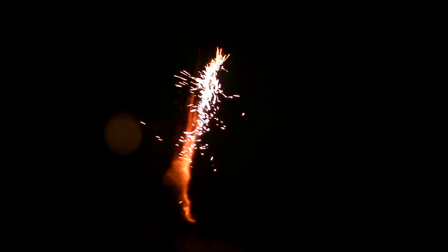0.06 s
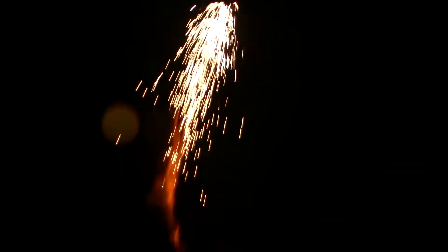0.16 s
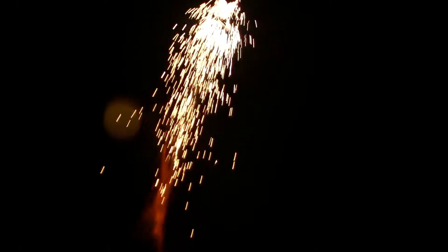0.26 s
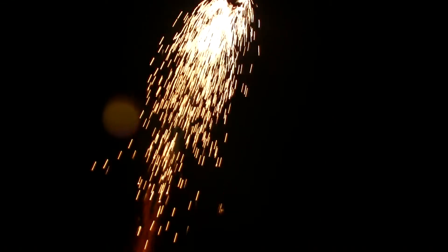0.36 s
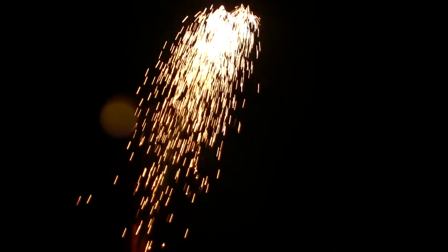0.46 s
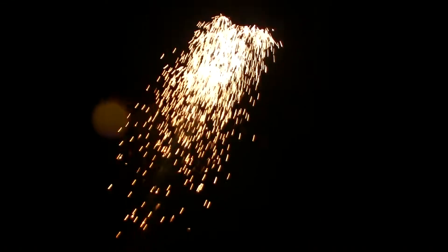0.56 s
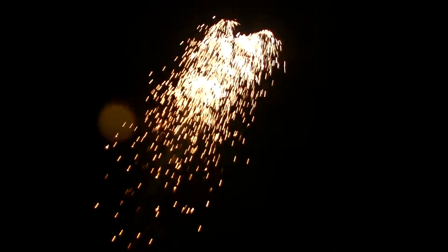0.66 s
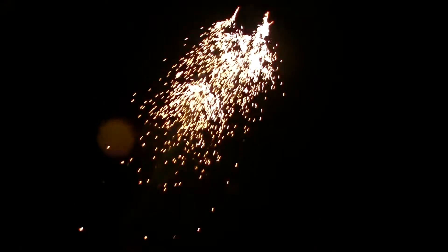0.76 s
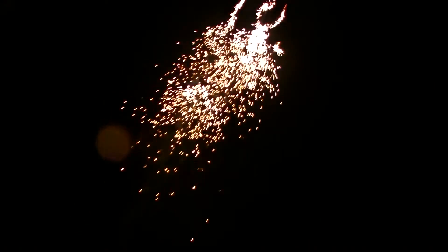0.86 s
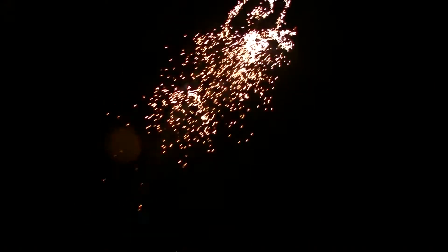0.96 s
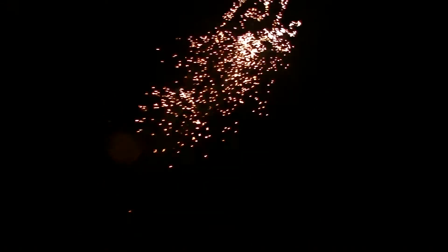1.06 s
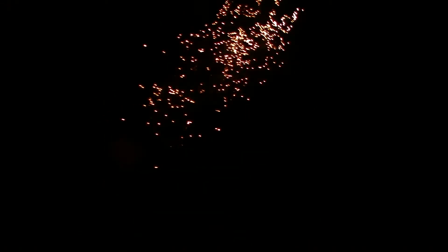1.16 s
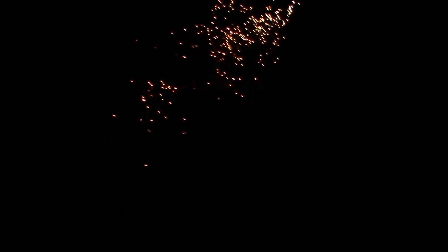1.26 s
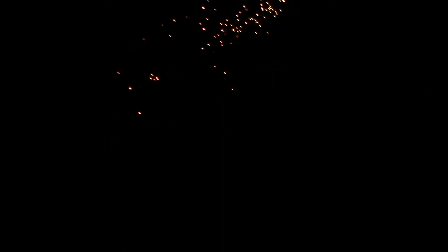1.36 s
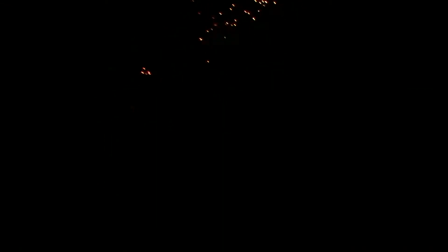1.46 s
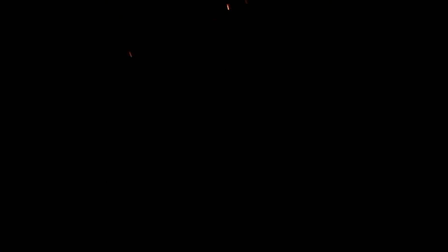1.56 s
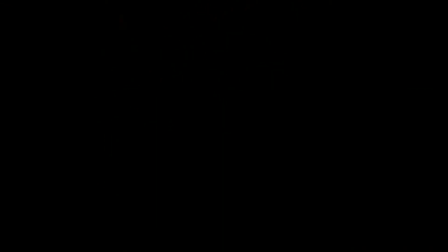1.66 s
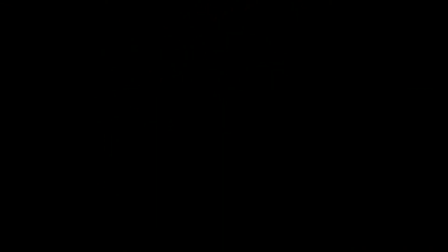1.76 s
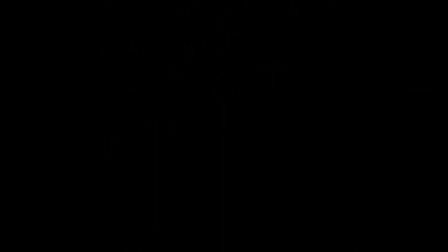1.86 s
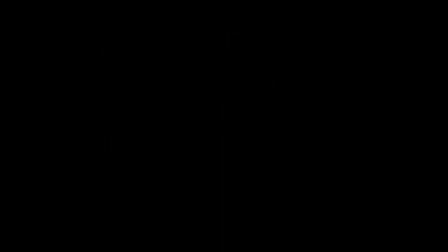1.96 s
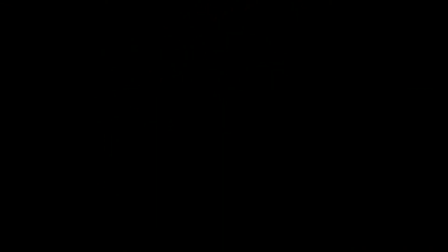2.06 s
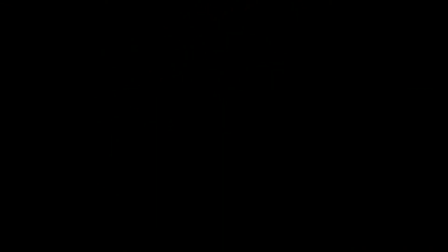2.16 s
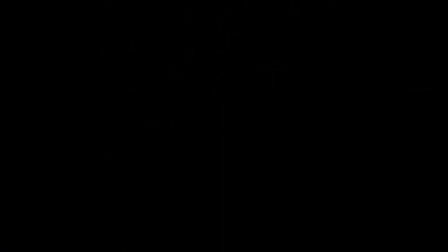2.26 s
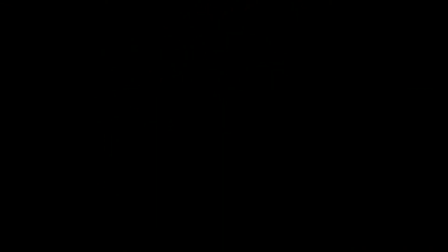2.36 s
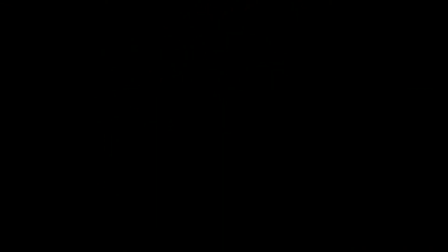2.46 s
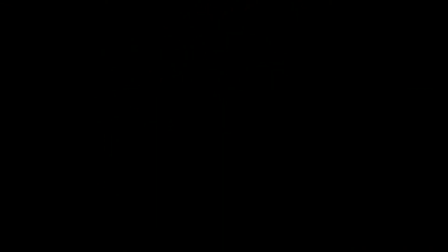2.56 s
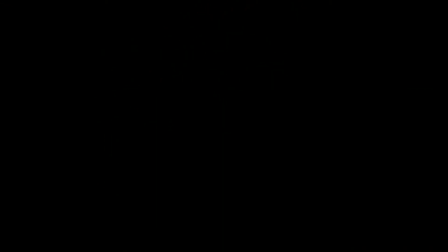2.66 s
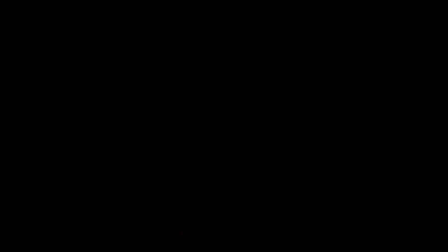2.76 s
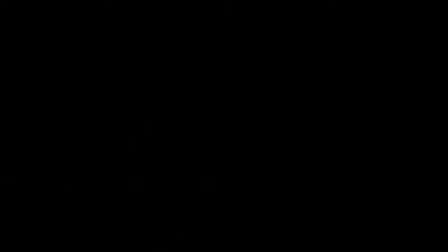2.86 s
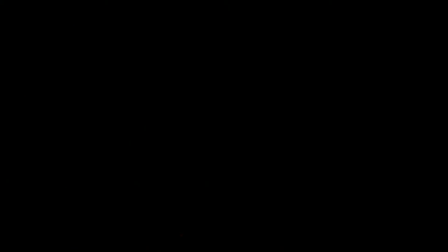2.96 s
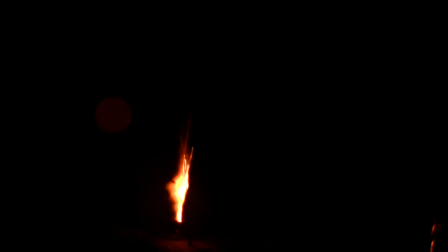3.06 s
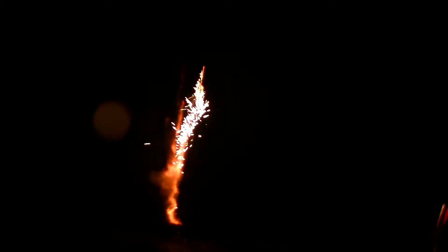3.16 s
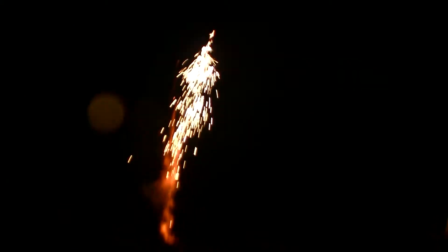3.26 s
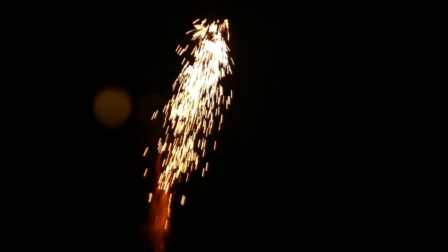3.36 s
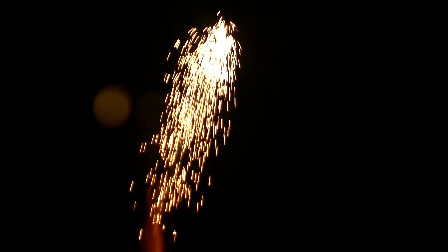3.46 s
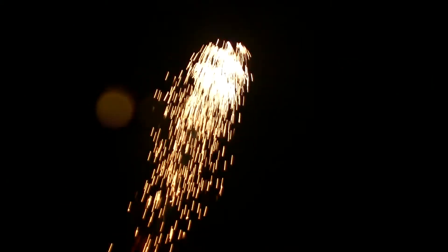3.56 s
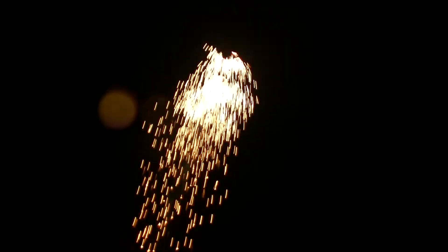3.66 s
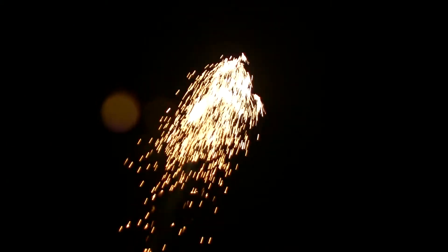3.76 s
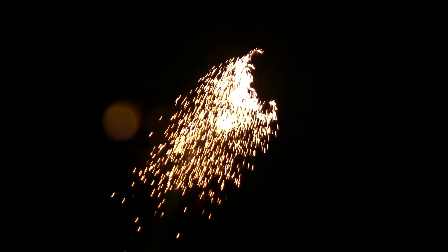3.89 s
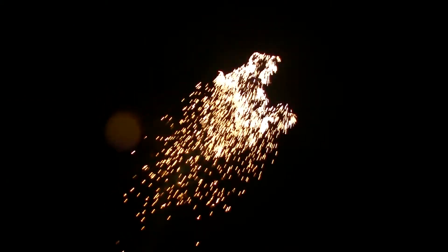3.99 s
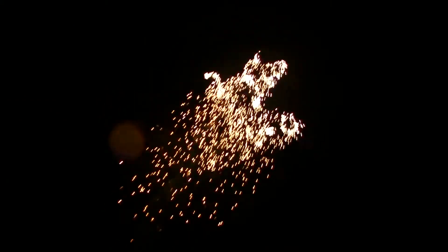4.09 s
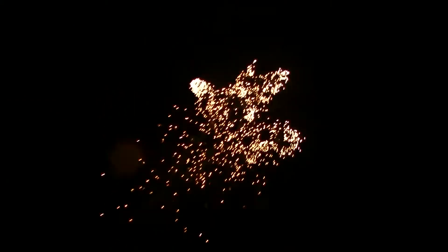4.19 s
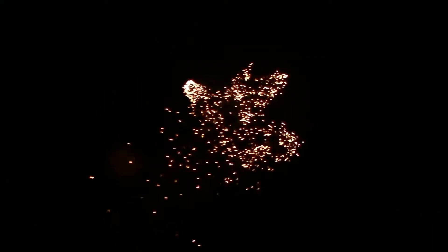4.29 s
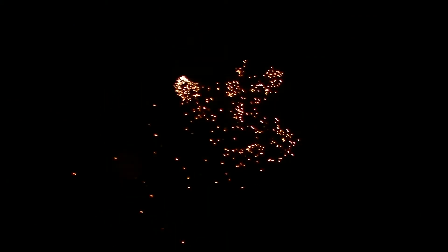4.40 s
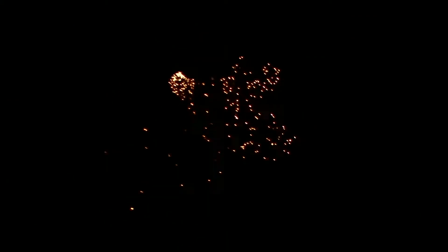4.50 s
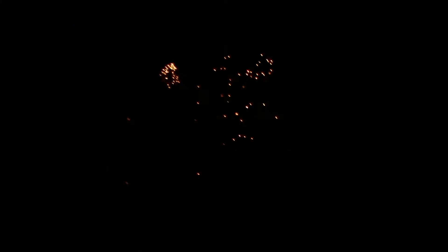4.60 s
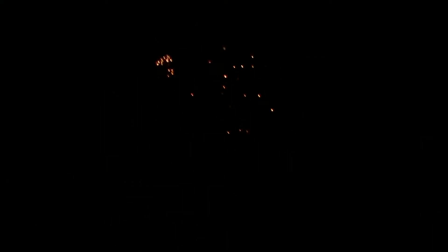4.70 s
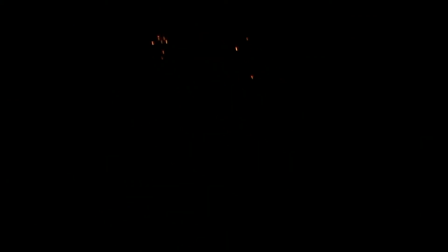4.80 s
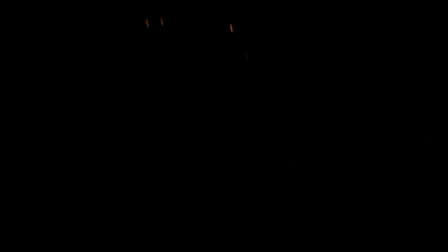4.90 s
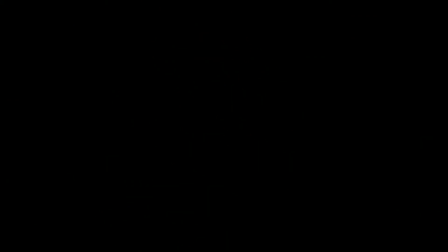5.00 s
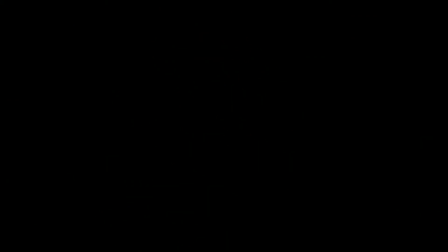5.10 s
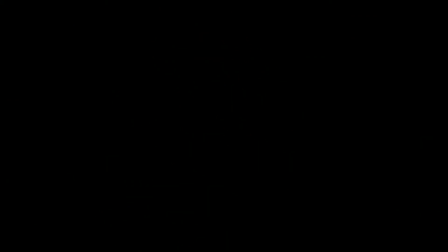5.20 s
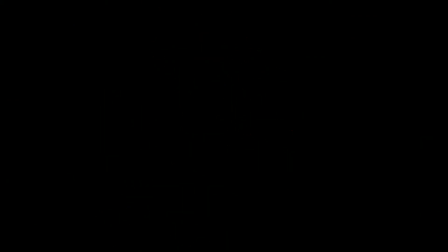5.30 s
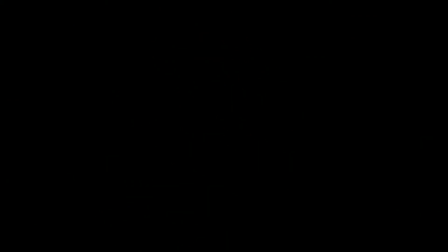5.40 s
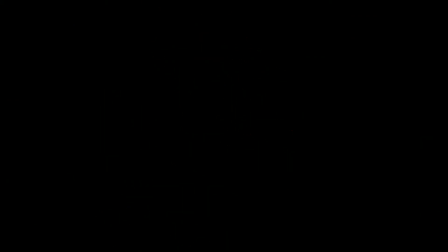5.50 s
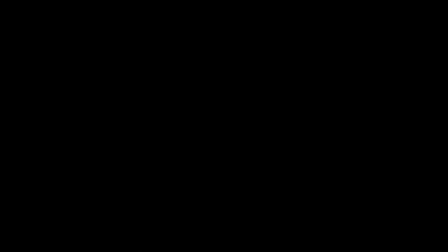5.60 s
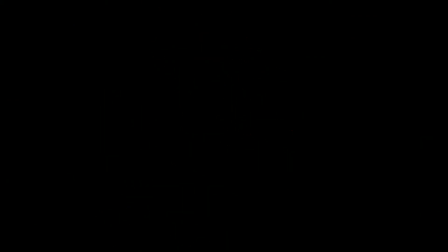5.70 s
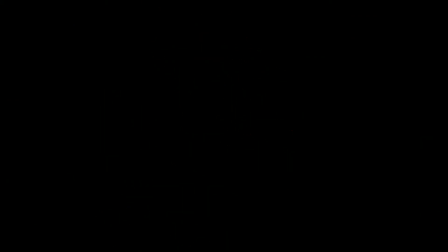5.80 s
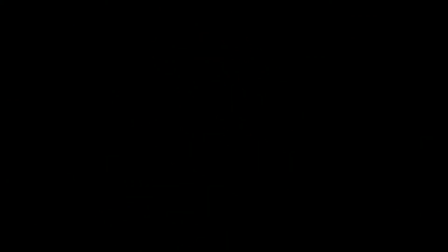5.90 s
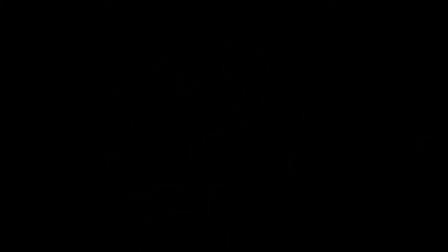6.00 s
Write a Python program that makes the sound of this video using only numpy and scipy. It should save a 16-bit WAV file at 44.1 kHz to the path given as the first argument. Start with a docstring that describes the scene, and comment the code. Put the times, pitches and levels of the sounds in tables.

```python
"""Outdoors at night, a firework tube fires twice: each lift charge pops and throws up a pair of whistlers.
Burning pipes make the whistles, which fall in pitch, rasp, then clear and bend upward as they burn out.
Random puffs of gas make the rough sputter; short noise bursts make the ticking sparks.
The surroundings echo, the first pop leaves a low tail, and light wind touches the microphone.
A gain control ducks at loud sound and slowly brings the night air back."""
import sys
import numpy as np
from scipy import signal
from scipy.fft import rfft, irfft, next_fast_len
from scipy.io import wavfile
from scipy.ndimage import uniform_filter1d, map_coordinates

SR = 44100
rng = np.random.default_rng(int(sys.argv[2]) if len(sys.argv) > 2 else 0)


def inscribe(sig):
    """Save sig as 16-bit PCM at rate SR to the path in sys.argv[1].

    A 1-D sig is mono; a 2-D sig holds one channel per row.
    Samples are clipped to [-1, 1] before scaling.
    """
    pcm = np.round(np.clip(np.atleast_2d(sig).T, -1, 1) * 32767)
    wavfile.write(sys.argv[1], SR, pcm.astype(np.int16))


N = 266540
TIME = np.arange(N) / SR  # seconds

# When the tube fires. Each entry: launch time in seconds (the first is just before the sound begins).
LAUNCHES = [-0.032, 3.1099]


def amp(db):
    """Turn decibels into a gain."""
    return 10 ** (np.asarray(db) / 20)


def unit(x):
    """Scale a sound to rms 1."""
    return x / np.sqrt(np.mean(x ** 2) + 1e-20)


def along(points, hz):
    """Read a curve of (Hz, value) points on a log frequency axis."""
    f, v = np.transpose(points)
    return np.interp(np.log(hz + 1), np.log(f), v)


def wobble(rate):
    """A smooth random curve through this many random points a second."""
    knots = rng.standard_normal(int(N * rate / SR) + 4)
    fine = np.arange(0, len(knots) - 1, 1 / 8)
    return np.interp(TIME * rate, fine, map_coordinates(knots, [fine]))


def filtered(x, gain):
    """Filter x to this gain over frequency, with a response that never starts early (minimum phase)."""
    size = 2 * next_fast_len(N // 2 + SR // 4)
    cepstrum = irfft(np.log(np.maximum(gain(np.fft.rfftfreq(size, 1 / SR)), 1e-6)))
    fold = np.r_[1, np.full(size // 2 - 1, 2), 1, np.zeros(size // 2 - 1)]
    response = np.exp(rfft(cepstrum * fold))
    return irfft(rfft(x, size) * response)[:N]


def coloured(x, spectrum):
    """Shape x by (Hz, dB) points and scale it to rms 1."""
    return unit(filtered(x, lambda hz: amp(along(spectrum, hz))))


def noise(spectrum):
    """Coloured noise of rms 1."""
    return coloured(rng.standard_normal(N), spectrum)


def fading(start, t60):
    """An envelope that jumps to 1 at start and falls 60 dB every t60 seconds."""
    return (TIME >= start) * amp(-60 * np.maximum(TIME - start, 0) / t60)


def fading_after(end, t60):
    """An envelope that stays at 1 until end, then falls 60 dB every t60 seconds."""
    return amp(-60 * np.maximum(TIME - end, 0) / t60)


def bump(centre, spread):
    """A smooth swell of height 1, down to about a third at spread seconds either side."""
    return np.exp(-((TIME - centre) / spread) ** 2)


def progress(start, end):
    """Runs from 0 at start to 1 at end."""
    return np.clip((TIME - start) / (end - start), 0, 1)


def night():
    """Soft noise for outdoor air, and low noise for the first pop's tail and for wind on the microphone."""
    # Sound of the open air. Each row: frequency in Hz, relative level in dB per Hz.
    air_colour = [(25, -11), (120, -2.5), (300, -4), (700, -10), (1500, -18.5), (3000, -22), (5000, -26.5),
                  (9000, -28.5), (15000, -38)]
    # Low rumble of the pop's tail and of the wind. Each row: frequency in Hz, relative level in dB per Hz.
    rumble_colour = [(12, -45.5), (20, -13), (103, -3), (225, -8.5), (282, -14.5), (458, -26), (528, -26),
                     (600, -28), (780, -59.5), (1320, -120)]
    # Swells of the rumble: the first row is the low tail of the first pop, still dying away as the sound
    # begins; the rest are gusts. Each row: middle in seconds, spread in seconds, level in dB before flutter.
    swells = [(0, 0.068, -40), (1.62, 0.018, -45), (1.79, 0.048, -38), (1.9, 0.1, -40), (2.189, 0.027, -44),
              (2.48, 0.18, -54), (2.81, 0.056, -47.5), (5.17, 0.079, -56), (5.58, 0.092, -59)]
    (tail_middle, tail_spread, tail_db), gusts = swells[0], swells[1:]
    pop_tail = amp(tail_db) * bump(tail_middle, tail_spread)
    wind = amp(-63)  # the breeze between gusts
    for middle, spread, db in gusts:
        wind = wind + amp(db) * bump(middle, spread)
    air = amp(-57.0) * noise(air_colour)
    flutter = amp(0.84 * wobble(25))
    return air + (pop_tail + wind) * flutter * noise(rumble_colour)


def echo(x):
    """The far surroundings answer for seconds, as a noise tail that dies at its own speed in each band."""
    # How long the echo rings. Each row: frequency in Hz, time to fall 60 dB in seconds.
    ring_times = [(200, 1.8), (750, 3.26), (1130, 6), (1600, 4.67), (2000, 3.53), (2380, 4.08), (2900, 3.1),
                  (4000, 2.25), (6000, 2), (12000, 1)]
    # Tone of the echo. Each row: frequency in Hz, relative starting level in dB.
    echo_tone = [(100, -11.5), (600, 1.5), (1150, -2.5), (1600, -2), (2050, 1.5), (2300, 4.5), (2520, 1.5),
                 (3000, 2.5), (4200, 6.5), (6000, -1), (9000, 5), (15000, -15)]
    hz, t, z = signal.stft(rng.standard_normal(3 * SR), SR, nperseg=256)
    start_db = along(echo_tone, hz)[:, None]
    shape = amp(start_db - 60 * t / along(ring_times, hz)[:, None])
    tail = signal.istft(z * shape, SR, nperseg=256)[1] / np.sqrt(SR)
    return signal.fftconvolve(x, tail)[:N]


def sparks(rate=1500, scatter_db=4):
    """Dying sparks snap as brief noise bursts, among a faint random crackle; rate is ticks a second."""
    # Tone of a tick. Each row: frequency in Hz, relative level in dB per Hz.
    tick_colour = [(1000, -21.5), (4000, -2.5), (7000, -9), (12000, -25), (16000, -24)]
    # Single snaps. Each row: start in seconds, starting level in dB.
    snap_list = [(1.2984, -52), (1.5556, -43), (1.5678, -50), (1.606, -50), (1.649, -43), (1.717, -50),
                 (1.768, -44.5), (1.8525, -47.5), (2.0307, -50), (4.79, -52), (4.8353, -51.5), (5.011, -55),
                 (5.1128, -50.5)]
    # Clouds of dying sparks. Each row: middle in seconds, spread in seconds, level in dB before filtering.
    clouds = [(1.3, 0.27, -29), (4.55, 0.39, -40.5)]
    snap_envelope = sum(amp(db) * fading(start, t60=0.0073) for start, db in snap_list)
    snaps = noise(tick_colour) * snap_envelope
    density = 0
    for middle, spread, db in clouds:
        density = density + amp(db) * np.exp(-((TIME - middle) / spread) ** 2 / 2)
    sizes = amp(scatter_db * np.clip(rng.standard_normal(N), -2, 2))
    ticks = (rng.random(N) < rate / SR) * density * sizes
    return snaps + filtered(ticks, lambda hz: amp(along(tick_colour, hz)))


def pop(start, lead=0.0045, swing=0.002, cut_hz=90):
    """Gas jets past the shell for lead seconds, then the lift charge bursts out and the tube booms."""
    # Ringing of the tube. Each row: frequency in Hz, level in dB, time to fall 60 dB in seconds.
    tube_modes = [(99, -13, 0.084), (206, -10, .05), (263, 0, 0.035), (426, -5.5, 0.053),
                  (517, -18, 0.0073)]
    # Noise of the burst. Each row: frequency in Hz, relative level in dB per Hz.
    blast_colour = [(60, -4.5), (300, -5), (1200, -3.5), (4000, -6), (8000, -13.5), (15000, -32)]
    # Hiss of the escaping gas. Each row: frequency in Hz, relative level in dB per Hz.
    jet_colour = [(100, -17), (1500, -1), (3200, 7.5), (5000, 0.5), (8000, -11), (15000, -32)]
    age = np.maximum(TIME - start, 0)
    jet = amp(-16) * noise(jet_colour) * fading(start - lead, .08) * (TIME < start)
    boom = 0
    for hz, db, t60 in tube_modes:
        boom = boom - amp(db) * np.sin(2 * np.pi * hz * age) * fading(start, t60)
    shock = -amp(-1) * np.sin(2 * np.pi * age / swing) * (age < swing)  # one violent pressure swing
    blast_envelope = amp(-4) * fading(start, 0.052) + amp(-31.5) * fading(start, .16)
    blast = noise(blast_colour) * blast_envelope

    def bass_cut(hz):  # the deepest bass of the pop is cut away
        return 1 / np.hypot(1, (cut_hz / (hz + 1)) ** 3)
    return filtered(jet + boom + shock + blast, bass_cut)


def flight_time():
    """Seconds since the latest launch."""
    return TIME - np.where(TIME < LAUNCHES[1], *LAUNCHES)


def climb(x, bounce, soft_hz=3500, far_hz=10000, dull_after=0.67):
    """As the cluster climbs, air dulls it and the ground's dull copy comes later: a comb that sweeps down."""
    far = np.clip(flight_time() / dull_after, 0, 1) ** 3
    distant = filtered(x, lambda hz: 1 / np.hypot(1, (hz / far_hz) ** 3))
    x = (1 - far) * x + far * distant
    # seconds: lag at launch, the most the climb can add, how soon the climb slows
    first_lag_s, added_lag_s, slowing_s = 0.001075, .0072, 0.6726
    lag = first_lag_s + added_lag_s * (1 - np.exp(-flight_time() / slowing_s))
    soft = filtered(x, lambda hz: 1 / np.hypot(1, hz / soft_hz))
    return x + bounce * np.interp(TIME - lag, TIME, soft)


def surge():
    """How far the burning surges above or stalls below its usual strength, in dB."""
    # Surges and stalls. Each row: middle in seconds, change in dB.
    surges = [(.015, -9), (.037, 1), (.056, -6.5), (.1, 3), (.455, -5), (.48, 1.5), (.535, -4), (.735, 3),
              (.8, -2), (.922, -2.5), (.965, 2.5), (.998, -7), (1.028, 1), (3.173, 3.5), (3.213, -6.5),
              (3.282, 4), (3.314, 4), (3.4, -4.5), (3.435, 0.5), (3.51, -5), (3.545, -0.5), (3.58, -5.5),
              (3.62, 0.5), (4.108, 2.5), (4.136, -3), (4.21, 3.5), (4.345, -9.5), (4.37, 5), (4.437, -6.5)]
    return sum(db * bump(middle, 0.013) for middle, db in surges)


def burning(start, end, level_db, roar_fade_db, rasp_fade_db):
    """Gate, roar dB and rasp dB of one shot: the roar swells, the rasp weakens, then both are quickly gone."""
    spent = progress(start, end)
    gate = progress(start, start + 0.026) * fading_after(end, t60=0.29)
    db = level_db + surge()
    roar_db = db + 5 - 8 * (1 - spent) ** 3 - roar_fade_db * spent ** 4  # weakens late
    rasp_db = db + 6 - rasp_fade_db * spent ** 3.66
    return gate, roar_db, rasp_db


def sputter(row, rate=2300, scatter_db=1.0, split_hz=3000, surge_db=1, crack_db=-15, crack_hz=8500):
    """Unsteady burning: a hail of gas puffs makes roar and rasp; the biggest steepen into cracks."""
    # Tone of one puff of burning gas. Each row: frequency in Hz, relative level in dB per Hz.
    puff_colour = [(47, -62), (80, -28.5), (139, -24), (242, -12), (411, -9.5), (654, -5), (834, -8.5),
                   (1420, -3.5), (1810, -3.5), (2750, -1), (5840, -12.5), (8890, -29.5), (11600, -38.5),
                   (15800, -50.5)]
    gate, roar_db, rasp_db = burning(*row)
    scatter = amp(scatter_db * np.clip(rng.standard_normal(N), -2.3, 2.3))
    sizes = (rng.random(N) < rate / SR) * scatter  # rate is puffs a second
    puffs = coloured(sizes - sizes.mean(), puff_colour)

    def above(edge):
        return lambda hz: (hz / edge) ** 4 / (1 + (hz / edge) ** 4)
    roar = unit(filtered(puffs, lambda hz: 1 / np.sqrt(1 + (hz / split_hz) ** 4)))
    rasp = unit(filtered(puffs, above(split_hz)))
    # the fifth power makes the biggest puffs stand out
    cracks = unit(filtered(coloured(sizes ** 5, puff_colour), above(crack_hz)))
    bright = rasp + amp(crack_db) * cracks
    unsteady = amp(surge_db * wobble(70))
    return gate * unsteady * (amp(roar_db) * roar + amp(rasp_db) * bright)


def glide(start, bottom, turn, end, early_hz, low_hz, fall):
    """The pitch in Hz falls as fuel burns down the pipe, then rises and bends up towards burn-out."""
    # a freshly lit pipe starts higher and soon settles
    kick = 678.4 * np.exp(-np.maximum(TIME - start, 0) / .06)
    drop = (early_hz - low_hz) * (1 - progress(start, bottom)) ** fall
    rise = 1850 * (np.clip(TIME, turn, end) - turn)  # Hz per second
    last_bend = 291 * bump(end, .062)
    return low_hz + kick + drop + rise + last_bend


def life(start, end, level_db, loudest, spell, calming):
    """Gate, dB and roughness of a whistler: clear start, rough flight, loud spell and calm fading end."""
    age, left = np.maximum(TIME - start, 0), np.maximum(end - TIME, 0)
    fresh = np.exp(-(age / 0.12) ** 4)  # it starts loud and fairly clean
    gate = progress(start, start + 0.028) ** 2 * np.minimum(left / .02, 1)
    burn_out_db = -14 * np.exp(-left / 0.053)  # it fades as the fuel ends
    db = level_db + 7.5 * fresh + 8.5 * bump(loudest, spell) + burn_out_db
    roughest, calmest = .93, 0.084  # on a scale of 0 to 1
    rough = calmest + (roughest - calmest) * (1 - .42 * fresh) * (1 - bump(end, calming))
    return gate, db, np.clip(rough, 0, 1)


def whistler(row, jitter=.068, wander=0.01313, flutter_db=4, shimmer_db=5, air_hz=11000, short_hz=3100,
             follows=0.46, brightens=0.28):
    """A burning pipe sings; rough burning shakes its pitch and level and upsets its strong-weak puffs."""
    # Overtones. Each row: multiple of the pitch, relative level in dB.
    overtones = [(2, -13), (3, -24.5), (4, -29), (5, -34)]
    # Undertones, from strong and weak puffs in turn. Each row: multiple of the pitch, relative level in dB.
    undertones = [(1 / 2, 0), (3 / 2, 0.5), (5 / 2, -15), (7 / 2, -28.5)]
    start, bottom, turn, end, early_hz, low_hz, fall, level_db, loudest, spell, calming = row
    hz = glide(start, bottom, turn, end, early_hz, low_hz, fall)
    gate, db, rough = life(start, end, level_db, loudest, spell, calming)
    push_db = surge()
    rough_shake = rough ** 1.3 * (jitter * wobble(650) + wander * wobble(160))
    shake = rough_shake + 0.00497 * wobble(110) + .007 * wobble(35)  # as a fraction of the pitch
    phase = 2 * np.pi * np.cumsum(hz * (1 + shake)) / SR

    over = 0
    for multiple, db_over in overtones:
        shimmer = amp(db_over + shimmer_db * np.tanh(wobble(60)))  # each overtone shimmers on its own
        air_loss = 1 + (multiple * hz / air_hz) ** 4  # the highest are lost in the air
        over = over + shimmer * np.sin(round(multiple) * phase) / air_loss
    pulsing_db = 7 * np.tanh(2 * wobble(55))  # shared by all overtones
    over = over * amp(1 + brightens * push_db + pulsing_db)
    over = over * (1 - bump(end, 0.067)) ** 2  # the last calm burn is nearly a sine
    over = over / (1 + (hz / short_hz) ** 8)  # overtones are weaker while the pitch is high

    slip = 0.98 * rough * wobble(400)  # rough burning loses the strong-weak rhythm
    under = 0
    for multiple, db_under in undertones:
        under = under + amp(db_under) * np.sin(round(2 * multiple) / 2 * phase + slip)
    split_db = -9.5 - 13.5 * (1 - progress(start, bottom))  # weaker early in the flight
    gone = end - 0.11  # undertones stop this moment, before burn-out
    split = amp(split_db) * (1 - progress(gone - .05, gone))
    under = under * split * amp(brightens * push_db + 2.4 * wobble(45))

    purer = amp(-3.5 * bump(loudest, spell))  # the loud spell has less of the other partials
    tone = np.sin(phase) + purer * (over + under)
    level = amp(db + follows * push_db + flutter_db * np.sqrt(rough) * wobble(170))
    return gate * level * tone


def scene():
    """Whistles, sputter and pops with their echo, over sparks and night air."""
    # The singing pipes. Each row: lit in seconds, fall ends in seconds, rise begins in seconds,
    # burns out in seconds, early pitch in Hz before the kick, low pitch in Hz before the rise, curve of the fall,
    # base level in dB, loudest moment in seconds, spread of that spell in seconds, spread of the calm in seconds.
    whistlers = [(0, .75, .935, 1.145, 3200, 2227, .85, -24.5, 0.9, 0.28, .12),
                 (0.044, .89, .895, 1.202, 3403, 1971, .7, -23.5, 1, 0.16, 0.27),
                 (3.138, 4.02, 4.18, 4.355, 3328, 2165, .95, -23, 4.25, 0.14, 0.139),
                 (3.195, 4.29, 4.4, 4.585, 3419, 1944, 1.4, -25, 4.024, .17, 0.447)]
    # The sputter of each shot. Each row: start in seconds, start of dying away in seconds, base level in dB,
    # roar fade in dB, rasp fade in dB.
    burns = [(-.015, 1.011, -21.5, 10.5, 10), (3.155, 4.274, -20.5, 15.5, 17)]
    background = sparks() + night()
    bang = sum(pop(start) for start in LAUNCHES)
    rasp = climb(sum(sputter(row) for row in burns), bounce=0.35)
    song = climb(sum(whistler(row) for row in whistlers), bounce=0.14)
    far = echo(amp(-21.5) * song + amp(-14.5) * rasp + amp(-10) * bang)
    return (song + rasp + bang + far + background)[None]


def gain_control(x, threshold_db=-31, lift_db=22, hold=0.54, release=0.74):
    """Loud sound above the bass drops the gain at once; after a hold in seconds it creeps back up."""
    heard = filtered(x, lambda hz: hz ** 2 / (hz ** 2 + 800 ** 2))
    loud = uniform_filter1d(heard ** 2, size=48) > amp(threshold_db) ** 2
    since = TIME - np.maximum.accumulate(np.where(loud, TIME, 0))  # seconds since it was last loud
    recovery = 1 - np.exp(-np.maximum(since - hold, 0) / release)
    return x * amp(lift_db * recovery)


def record(dry):
    """Apply gain control, a rounded clip at full scale and a sharp cut of the highest treble."""
    x = gain_control(dry[0])
    x = x / (1 + np.abs(x) ** 6) ** (1 / 6)
    size = next_fast_len(N + SR // 2)
    kept = np.fft.rfftfreq(size, 1 / SR) < 15850  # Hz
    return irfft(rfft(x, size) * kept, size)[None, :N]


dry = scene()
out = record(dry)
inscribe(out)
```